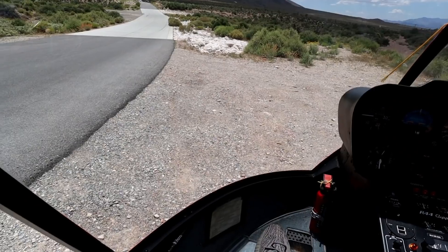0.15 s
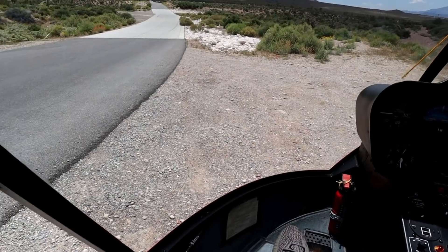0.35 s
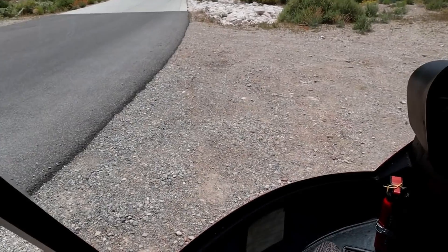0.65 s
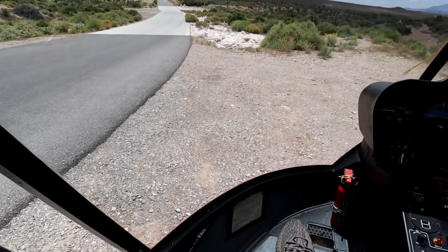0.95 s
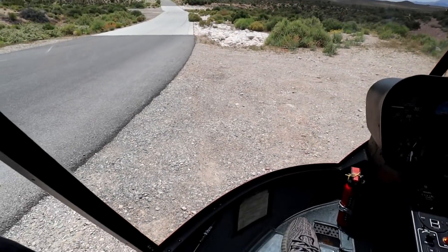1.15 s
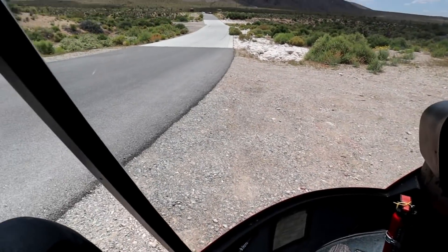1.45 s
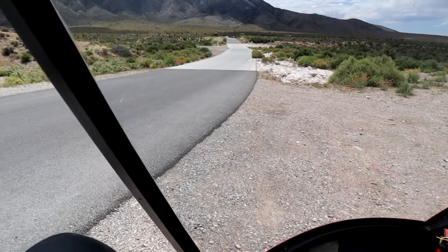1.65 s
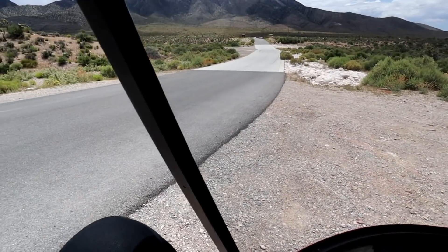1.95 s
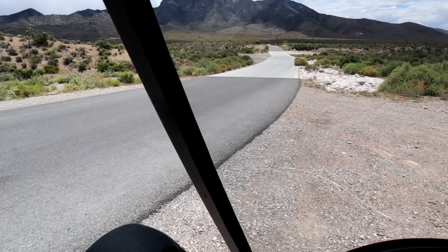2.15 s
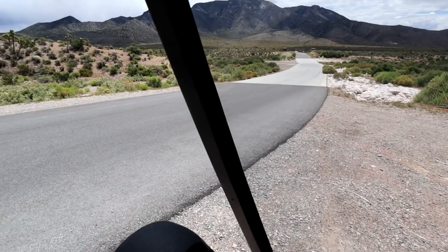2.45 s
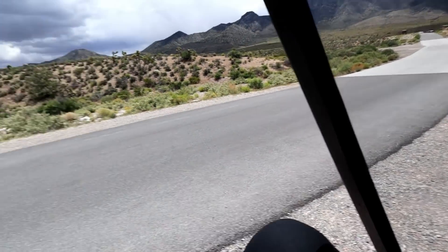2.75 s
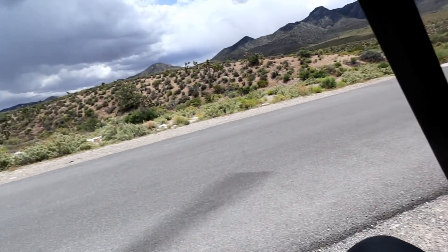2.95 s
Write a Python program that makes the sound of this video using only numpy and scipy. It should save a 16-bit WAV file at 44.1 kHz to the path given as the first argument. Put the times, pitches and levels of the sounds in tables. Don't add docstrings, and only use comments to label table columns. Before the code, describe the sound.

A small piston helicopter hovers low, heard close inside its open cabin: steady low engine drone, rumbling gusty downwash, and about fourteen airy blade swishes a second. A faint scrap of outdoor air and brief silence precede it.

```python
import sys
import numpy as np
from scipy import signal
from scipy.fft import rfft, irfft
from scipy.io import wavfile
from scipy.ndimage import uniform_filter1d

SR = 44100
rng = np.random.default_rng(int(sys.argv[2]) if len(sys.argv) > 2 else 0)


def dump_mix(stems):
    frames = np.atleast_2d(stems).T
    limited = np.clip(frames, -1, 1)
    pcm = np.round(limited * 32767).astype(np.int16)
    wavfile.write(sys.argv[1], SR, pcm)


def boost(x):
    u = np.asarray(x, float) / 20
    return 10 ** u


N = 136710

# (time [s], exhaust firings [1/s])
FIRING_RATE = [
    (0, 139.6),
    (.8, 140.0),
    (1.4, 139.2),
    (2.0, 138.0),
    (3.1, 137.1),
]
# (time [s], level [dB])
ENGINE_LOAD = [
    (0, -19.5),
    (.4, -16),
    (1, -18),
    (1.6, -18),
    (2.3, -18.5),
    (2.6, -22.5),
    (3.1, -20.5),
]
# (multiple of crank turns [-], level re firing tone [dB])
CRANK_ORDERS = [(1, -19), (2, -20.5), (3, 0), (4, -13.5), (5, -13), (6, -24), (9, -16.5), (12, -35)]
# (multiple of blade passes [-], level [dB])
MAIN_ORDERS = [(1, -48), (2, -62), (3, -33), (4, -38), (5, -35.5), (6, -41), (7, -53.5), (8, -38.5),
               (9, -38.5), (11, -31)]
# (multiple of tail blade passes [-], level [dB])
TAIL_ORDERS = [(1, -42.5), (2, -28), (3, -32), (4, -34), (5, -38.5)]
# (time [s], level [dB])
GUSTS = [(0.08, -18.5), (0.15, -17), (0.18, -17.5), (0.21, -17), (1.21, -21), (1.7, -17.5), (1.78, -21),
         (1.8, -17), (2.06, -20.5), (2.38, -16.5), (2.44, -22), (2.46, -18.5), (2.53, -20.5), (3.1, -17.5)]
# (frequency [Hz], density [dB per Hz])
RUMBLE_COLOUR = [(15, -8), (28, 2), (45, 4), (95, 0), (130, 6), (200, 7), (300, 0), (450, -23)]
# (frequency [Hz], density [dB per Hz])
ROAR_COLOUR = [(100, -23), (220, -3), (400, -2.5), (800, -8.5), (1300, -13), (2000, -18), (3000, -28.5),
               (4500, -54)]
# (frequency [Hz], density [dB per Hz])
HISS_COLOUR = [(1500, -0.5), (3500, 0.5), (4800, -0.5), (6500, -10), (8000, -7.5), (11500, -12),
               (14000, -21), (15800, -36)]
# (frequency [Hz], level over the hiss [dB])
PUFF_COLOUR = [(1500, 11), (3500, 2), (6000, 0), (8000, 4), (10000, 3), (12500, 9), (15000, 12)]
# (time [s], openness [dB], low whistle strength [dB])
ROTOR_FACING = [
    (0, -2, -.5),
    (.5, -2, -1),
    (1, -2, -.5),
    (1.5, 0, .5),
    (2, 1, 1.5),
    (2.5, 2.5, 1),
    (2.75, 3.5, -2.5),
    (3.1, 4.5, -3.5),
]
# (frequency at the pass [Hz], fall [Hz per pass], width [Hz], level over the hiss [dB])
LOW_WHISTLES = [
    (4600, 2800, 430, 13),
    (5150, 2600, 430, 12),
]
# (frequency at the pass [Hz], fall [Hz per pass], width [Hz], level over the hiss [dB])
HIGH_WHISTLES = [
    (7750, 3500, 700, 11),
    (8250, 3500, 750, 10),
]
# (time [s], lead [blade passes])
SWISH_LEAD = [
    (0, .2),
    (.6, .14),
    (1, .19),
    (1.5, .21),
    (2.1, .25),
    (3.1, .18),
]
# (frequency [Hz], likeness [0-1], phase by which left leads [rad], left over right [dB])
PORT_PAIR = [(200, .998, 0, 0), (300, .93, 0, 1.3), (560, .72, -.15, 2.7), (1450, .5, 1.9, 2.5),
             (2900, .73, 3.0, 1.4), (4500, .82, 3.05, 3.9), (6500, .82, 3.1, 1.9), (13000, .6, 3.14, .6)]
# (frequency [Hz], density [dB per Hz])
OUTDOOR_COLOUR = [(40, -9), (250, 2), (700, 2), (1500, -12), (3000, -16), (3800, -20.5), (7000, -29),
                  (12500, -38)]

FIRINGS_PER_BLADE, TAIL_PASSES_PER_FIRING = 10, .591
RUMBLE_DB, ROAR_DB, HISS_DB, OUTDOOR_DB = -22.5, -2, -30, -37.5
SWISH_RISE, SWISH_FALL, PUFF_AT, PUFF_RISE, PUFF_FALL = .24, .13, .06, .11, .17
AIR_END_S, CUT_IN_S = .042, .0714
STEP_SIZE, STEP_S = 0.63, 0.00079
EDGE_HZ, END_DB_PER_OCTAVE = 15800, -40
PORT_LAG = 4


def engine(firing_count):
    crank_turns = firing_count / 3
    load = boost(curve(ENGINE_LOAD, np.arange(N) / SR))
    return load * orders(crank_turns, CRANK_ORDERS, waver_db=1.2, slip=.15, waver_hz=5.)


def main_rotor(firing_count):
    passes = firing_count / FIRINGS_PER_BLADE
    return orders(passes, MAIN_ORDERS, waver_db=3., slip=0.72, waver_hz=1.64)


def tail_rotor(firing_count):
    passes = firing_count * TAIL_PASSES_PER_FIRING
    return orders(passes, TAIL_ORDERS, waver_db=3.5, slip=1.2, waver_hz=3.)


def machinery():
    count = firings()
    tones = engine(count) + main_rotor(count) + tail_rotor(count)
    left, right = ports(tones, np.roll(tones, 3000))
    return np.array([left, np.roll(right, PORT_LAG)])


def downwash():
    t = np.arange(N) / SR
    gust_db = curve(GUSTS, t)
    mean_db = gust_db.mean()
    swing_db = gust_db - mean_db
    lumps, flicker = drift(28.3)[0], drift(141.0)[0]
    throb_depth_db = .9 + .2 * curve(ROTOR_FACING, t)
    throb_db = throb_depth_db * np.cos(2 * np.pi * (blade_passes() - .1))
    a, b, c, d = rng.standard_normal((4, N))
    low = boost(.4 * swing_db + 2.2 * lumps)
    high = boost(swing_db + .6 * lumps + 1.5 * flicker + throb_db)
    rumble = ports(a * low, b * low, RUMBLE_COLOUR)
    roar = ports(c * high, d * high, ROAR_COLOUR)
    return boost(RUMBLE_DB) * evened(rumble) + boost(ROAR_DB + mean_db) * evened(roar)


def swish():
    hz, t, z = signal.stft(rng.standard_normal((2, N)), SR, nperseg=256, noverlap=192)
    hz = hz[:, None]
    passes = np.interp(t, np.arange(N) / SR, blade_passes())
    n = np.round(passes).astype(int)
    u = passes - n
    facing_db = curve(ROTOR_FACING, t)
    luck = rng.standard_normal((n.max() + 1, 5))[n].T

    puff_db = read(PUFF_COLOUR, hz) + 1.2 * facing_db + .9 * luck[0]
    power = 1 + boost(puff_db + hump(u - PUFF_AT, PUFF_RISE, PUFF_FALL)) ** 2
    strengths_db = [curve(ROTOR_FACING, t, column=2), .6 * facing_db]
    for k, pair in enumerate([LOW_WHISTLES, HIGH_WHISTLES]):
        mid_hz, fall_hz, width_hz, db = np.array(pair)[1 - n % 2].T
        centre_hz = (mid_hz - fall_hz * u) * (1 + .02 * luck[1 + k])
        off = (hz - centre_hz) / width_hz
        bell_db = hump(u - .02 * k, SWISH_RISE, SWISH_FALL) - 4.3 * off ** 2
        power = power + boost(db + strengths_db[k] + .7 * luck[3 + k] + bell_db) ** 2

    patches = uniform_filter1d(rng.standard_normal(power.shape), 4, 0)
    patches = evened(uniform_filter1d(patches, 8, 1))
    z = z * np.sqrt(power) * boost(read(HISS_COLOUR, hz) + .2 * facing_db + 1.2 * patches)
    a, b = signal.istft(z, SR, nperseg=256, noverlap=192)[1][:, :N]
    return boost(HISS_DB) * ports(a, b)


def outdoor_air():
    hz = np.fft.rfftfreq(N, 1 / SR)
    colour = boost(read(OUTDOOR_COLOUR, hz)) * (hz < 12600)
    a, b = irfft(rfft(rng.standard_normal((2, N))) * colour, N)
    apart = irfft(rfft(b) * np.clip(hz / 6000, 0, 1) * (hz < 12500), N)
    return boost(OUTDOOR_DB) * evened(np.array([a + .5 * apart, a - .5 * apart]))


def firings():
    return np.cumsum(curve(FIRING_RATE, np.arange(N) / SR)) / SR


def blade_passes():
    return firings() / FIRINGS_PER_BLADE + curve(SWISH_LEAD, np.arange(N) / SR)


def orders(turns, table, waver_db, slip, waver_hz):
    k, db = np.transpose(table)[:, :, None]
    level = drift(waver_hz, count=len(table))
    phase = drift(waver_hz, count=len(table))
    start = rng.random((len(table), 1))
    sines = np.sin(2 * np.pi * (k * turns + start) + slip * phase)
    return (np.sqrt(2) * boost(db + waver_db * level) * sines).sum(0)


def ports(a, b, colour=None):
    hz = np.fft.rfftfreq(N, 1 / SR)
    same = np.clip(read(PORT_PAIR, hz), 0, 1)
    side_db = read(PORT_PAIR, hz, column=3) / 2
    a, b = rfft(a), rfft(b)
    turned = a * np.exp(-1j * read(PORT_PAIR, hz, column=2))
    right = same * turned + np.sqrt(1 - same ** 2) * b
    pair = np.array([a * boost(side_db), right * boost(-side_db)])
    if colour is not None:
        octaves_past_end = np.log2(np.maximum(hz / colour[-1][0], 1))
        pair = pair * boost(read(colour, hz) + END_DB_PER_OCTAVE * octaves_past_end)
    return irfft(pair, N)


def drift(top_hz, count=1):
    hz = np.fft.rfftfreq(N, 1 / SR)
    noise = rfft(rng.standard_normal((count, N)))
    return evened(irfft(noise * np.exp(-(hz / top_hz) ** 2), N))


def hump(u, rise, fall):
    return -4.3 * (u / np.where(u < 0, rise, fall)) ** 2


def evened(x):
    return x / np.sqrt(np.mean(x ** 2) + 1e-20)


def read(points, hz, column=1):
    table = np.array(points, float)
    return np.interp(np.log(hz + 1), np.log(table[:, 0] + 1), table[:, column])


def curve(points, t, column=1):
    table = np.array(points, float)
    return np.interp(t, table[:, 0], table[:, column])


def scene():
    t = np.arange(N) / SR
    step = np.exp(-np.maximum(t - CUT_IN_S, 0) / STEP_S)
    cabin = (machinery() + downwash() + swish()) * (1 - step) + STEP_SIZE * step
    air_fade = np.clip((AIR_END_S - t) / 0.0017, 0, 1)
    return cabin * (t >= CUT_IN_S) + outdoor_air() * air_fade


def band_limit(x):
    return signal.sosfilt(signal.butter(12, 16120, fs=SR, output="sos"), x)


def record(dry):
    overloaded = 2.5 * np.tanh(dry / 2.5)
    passband = np.fft.rfftfreq(N, 1 / SR) < EDGE_HZ
    mix = irfft(rfft(overloaded) * passband, N)
    return band_limit(mix)


dry = scene()
out = record(dry)
dump_mix(out)
```